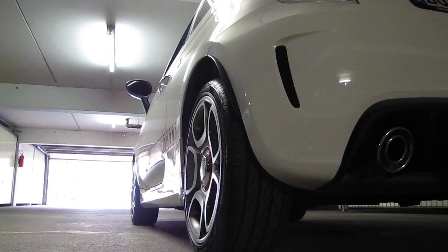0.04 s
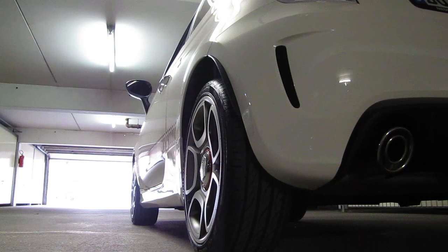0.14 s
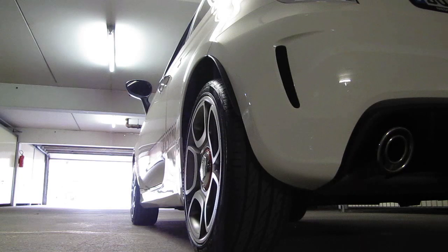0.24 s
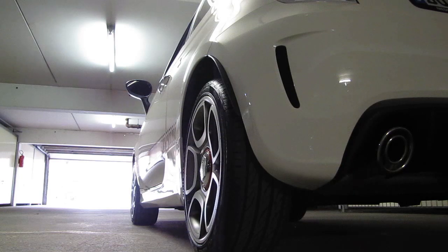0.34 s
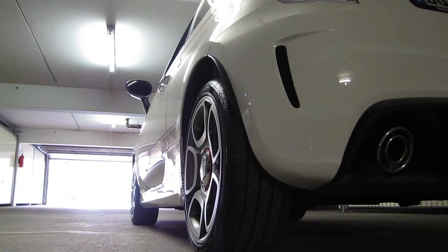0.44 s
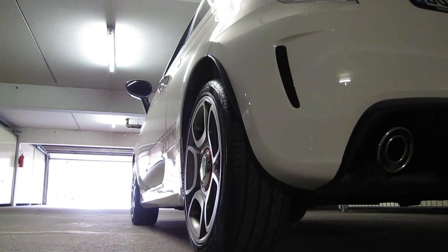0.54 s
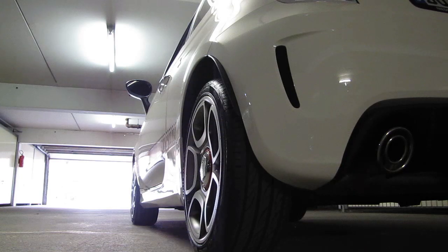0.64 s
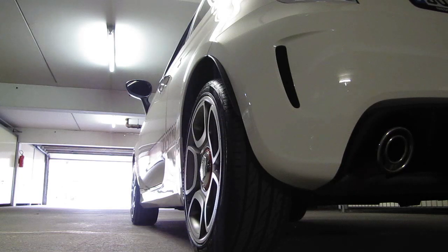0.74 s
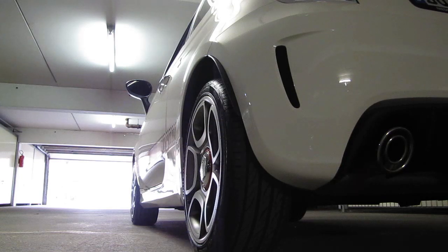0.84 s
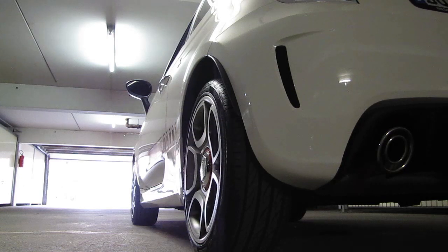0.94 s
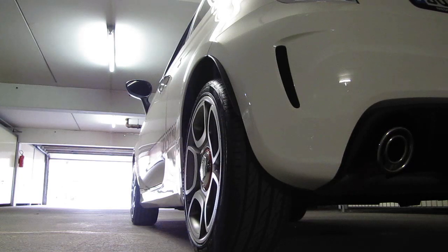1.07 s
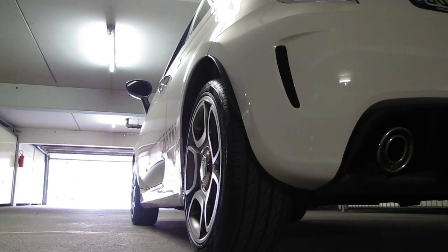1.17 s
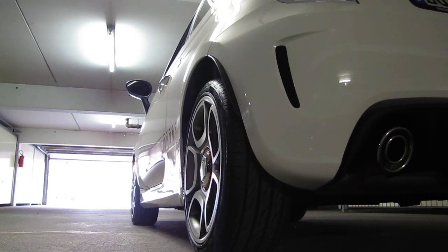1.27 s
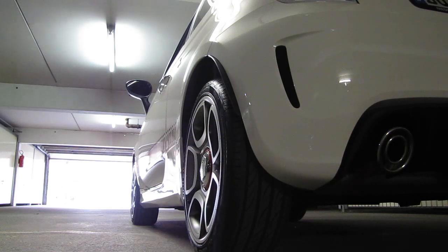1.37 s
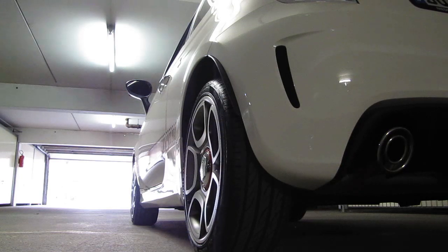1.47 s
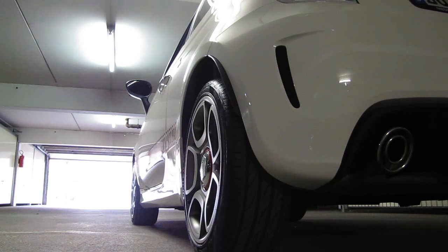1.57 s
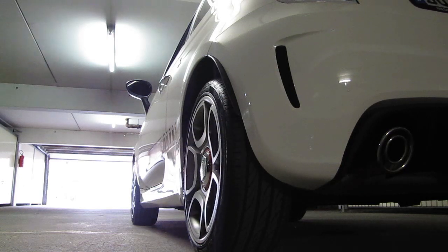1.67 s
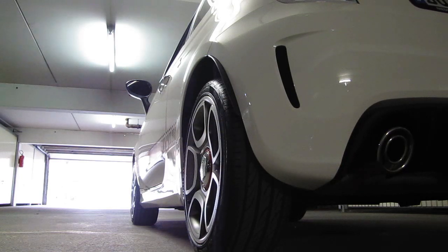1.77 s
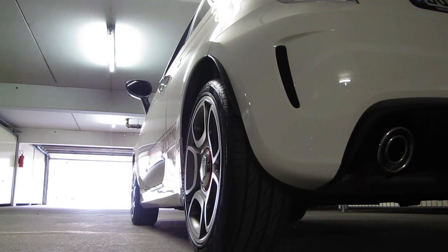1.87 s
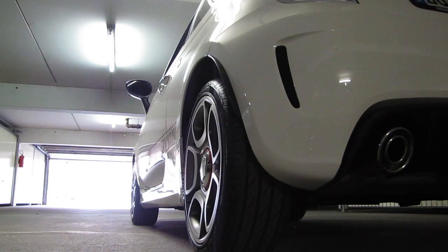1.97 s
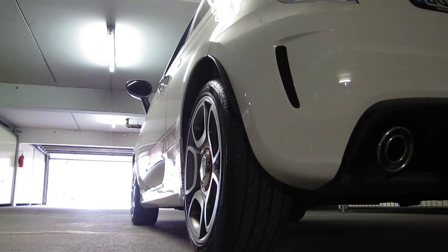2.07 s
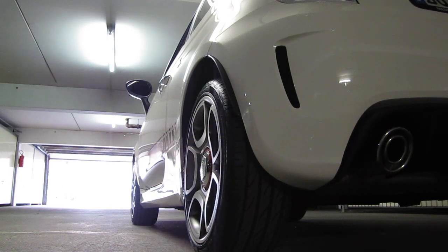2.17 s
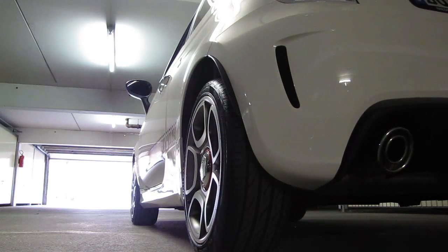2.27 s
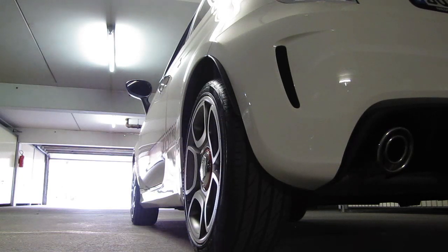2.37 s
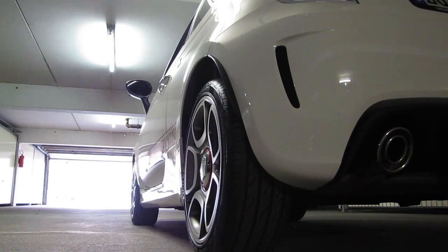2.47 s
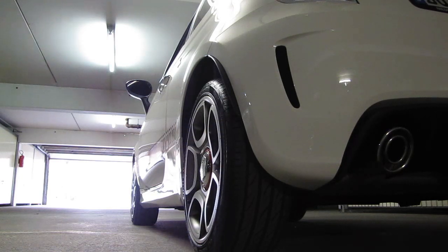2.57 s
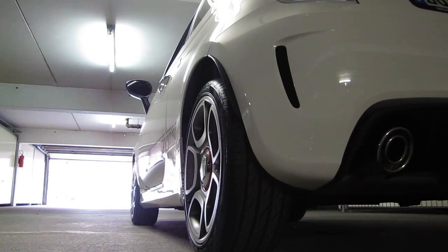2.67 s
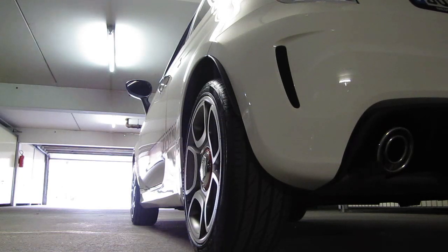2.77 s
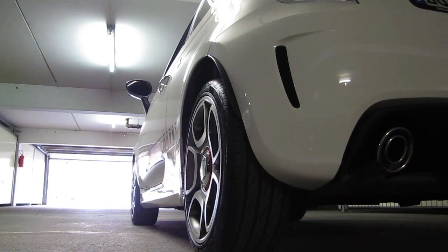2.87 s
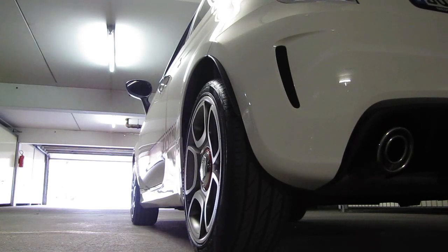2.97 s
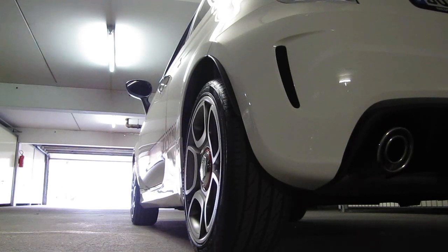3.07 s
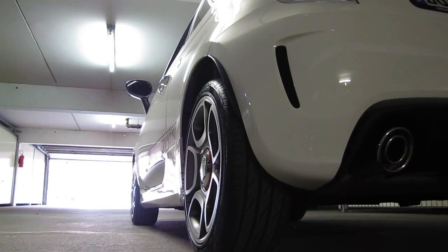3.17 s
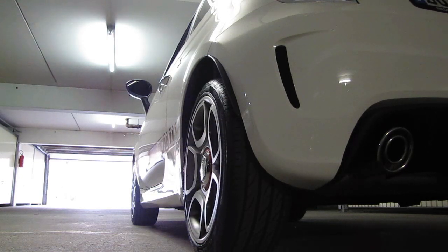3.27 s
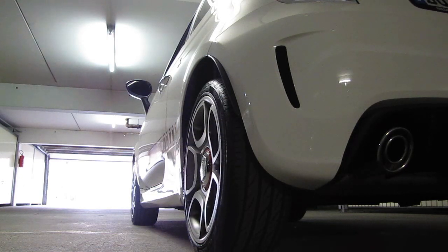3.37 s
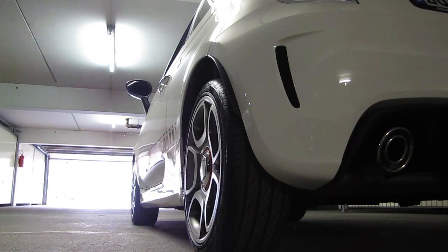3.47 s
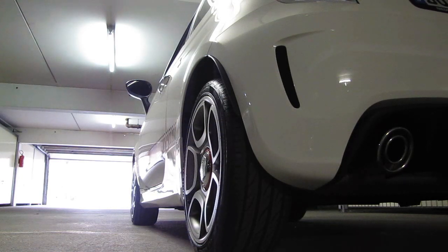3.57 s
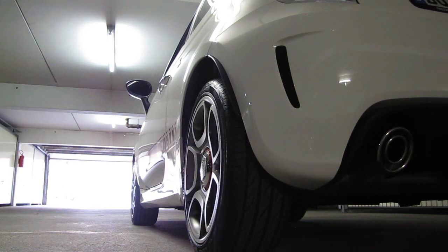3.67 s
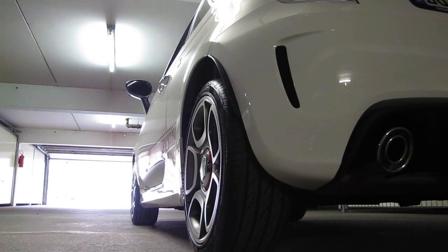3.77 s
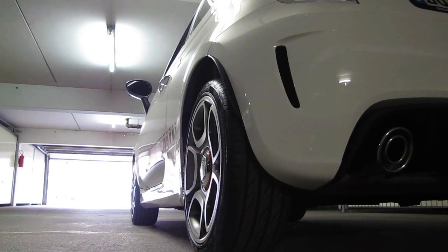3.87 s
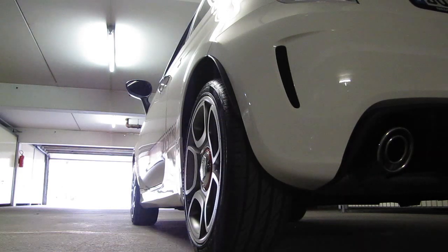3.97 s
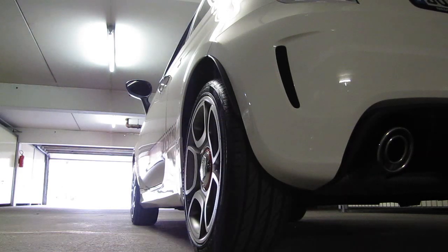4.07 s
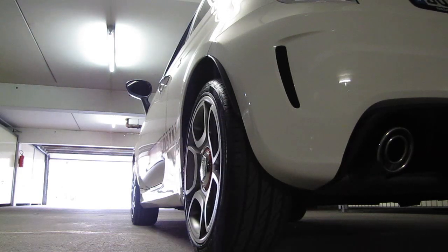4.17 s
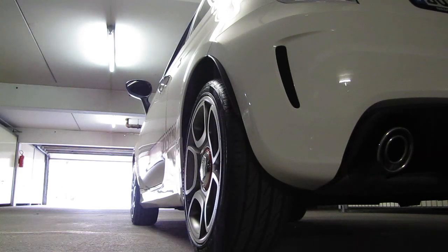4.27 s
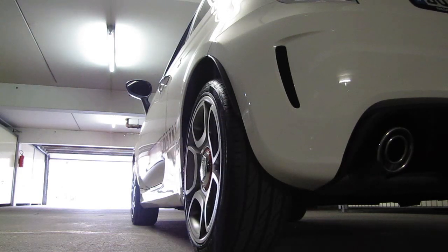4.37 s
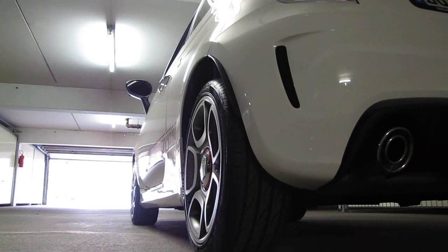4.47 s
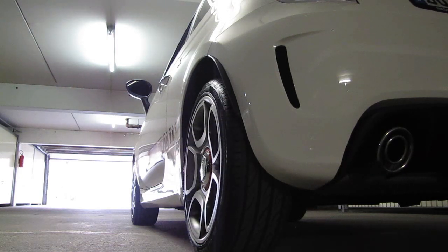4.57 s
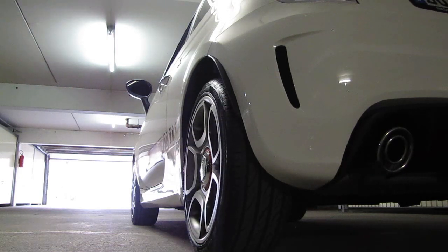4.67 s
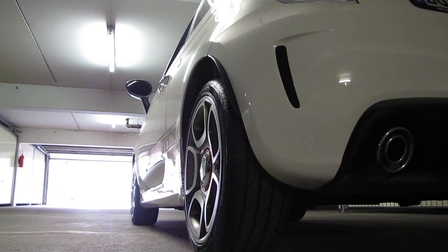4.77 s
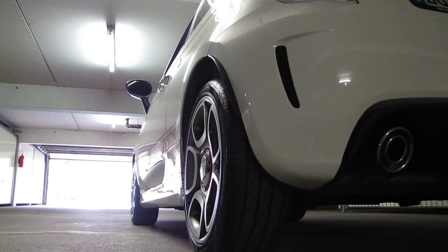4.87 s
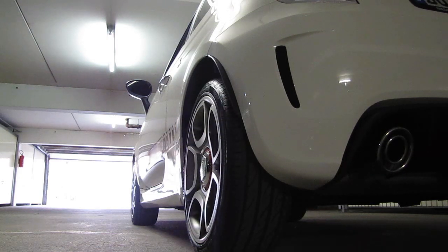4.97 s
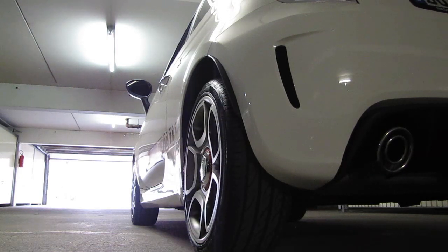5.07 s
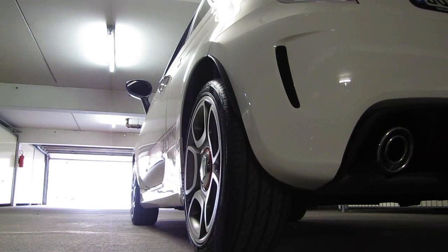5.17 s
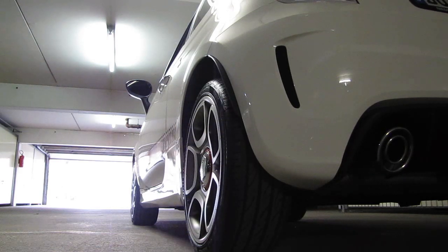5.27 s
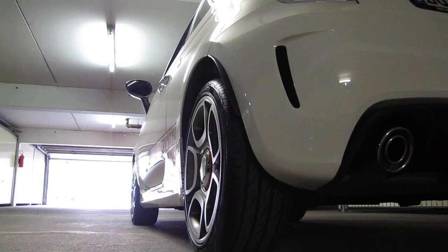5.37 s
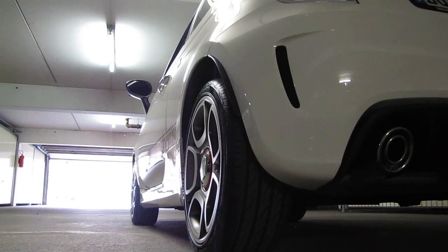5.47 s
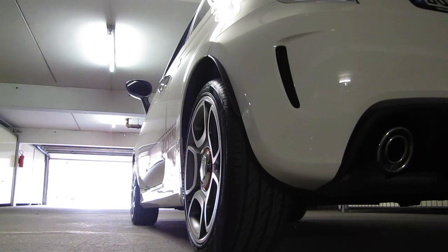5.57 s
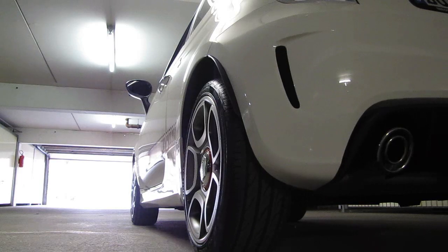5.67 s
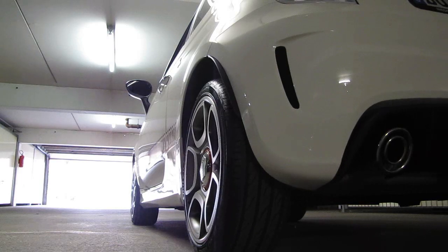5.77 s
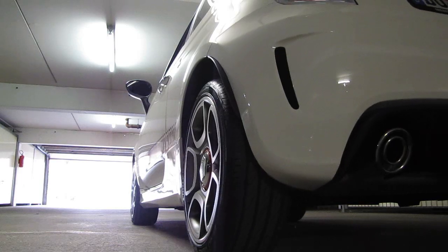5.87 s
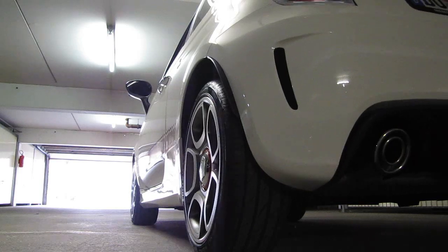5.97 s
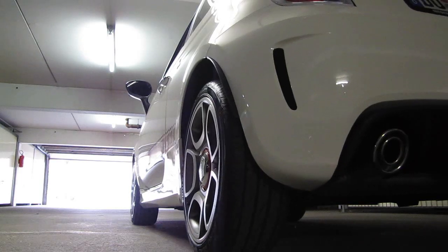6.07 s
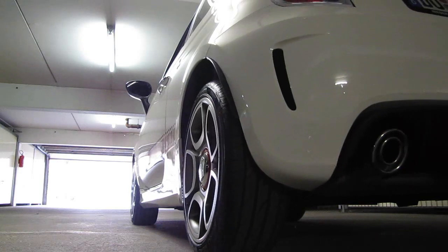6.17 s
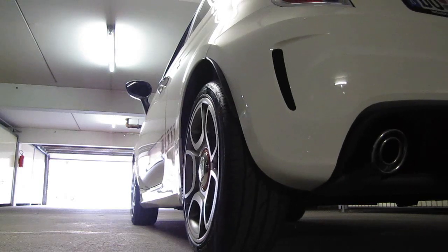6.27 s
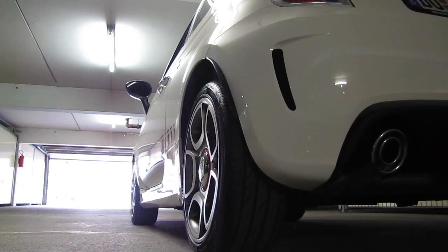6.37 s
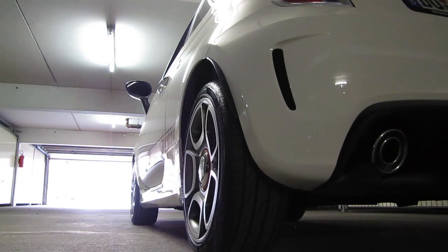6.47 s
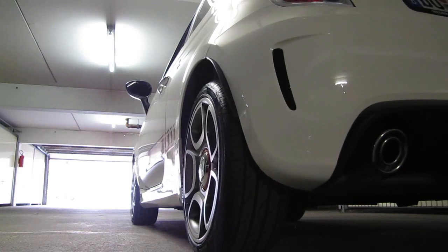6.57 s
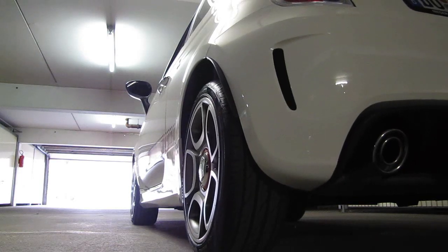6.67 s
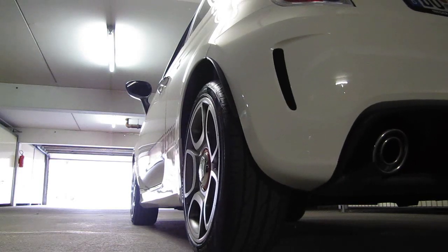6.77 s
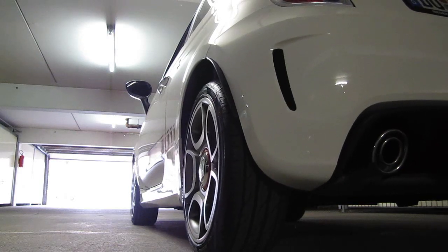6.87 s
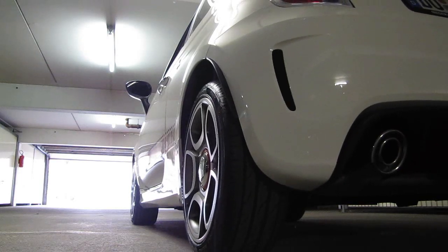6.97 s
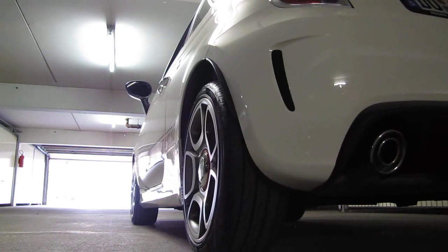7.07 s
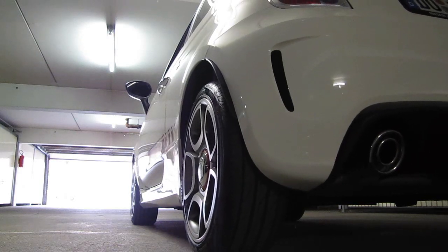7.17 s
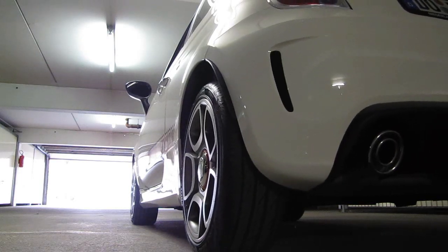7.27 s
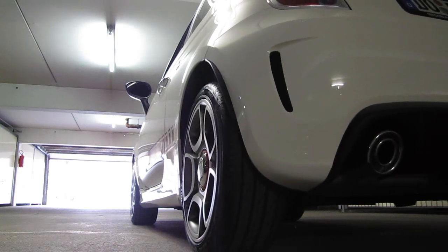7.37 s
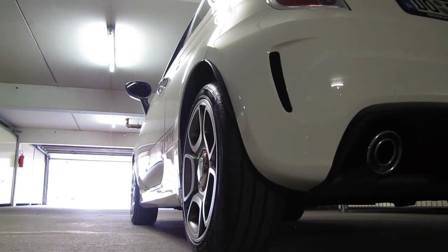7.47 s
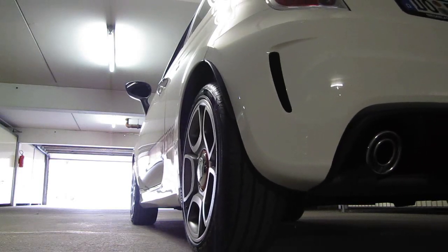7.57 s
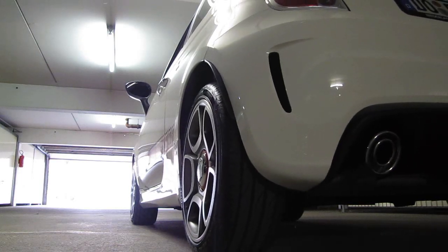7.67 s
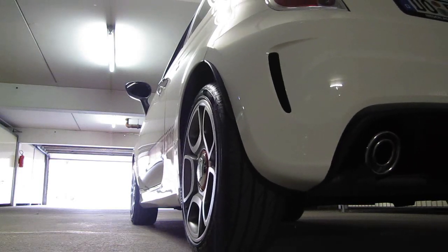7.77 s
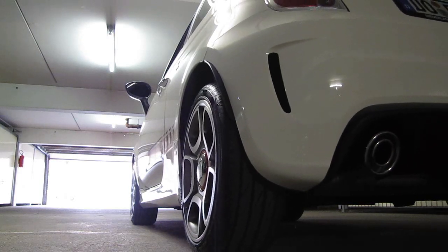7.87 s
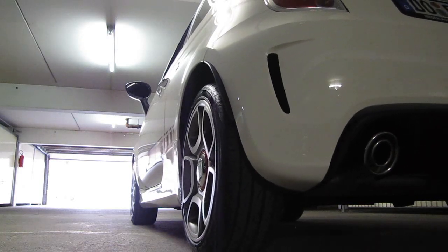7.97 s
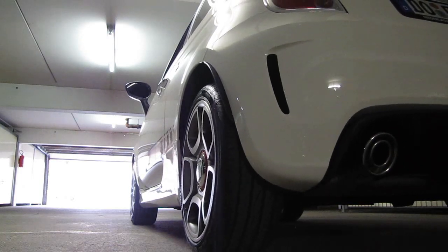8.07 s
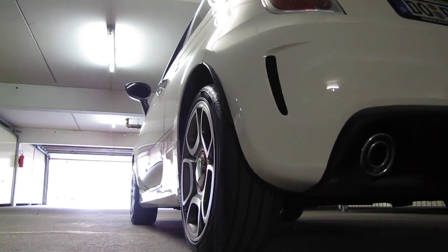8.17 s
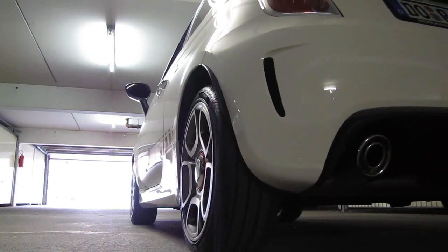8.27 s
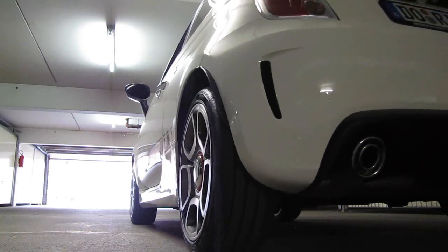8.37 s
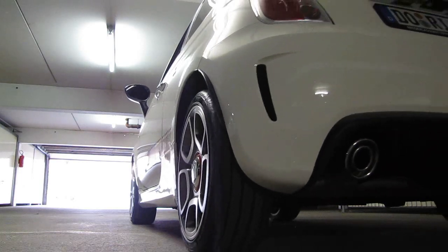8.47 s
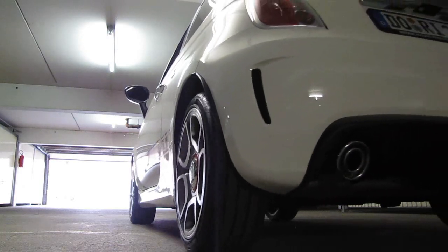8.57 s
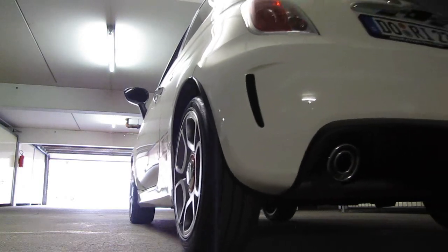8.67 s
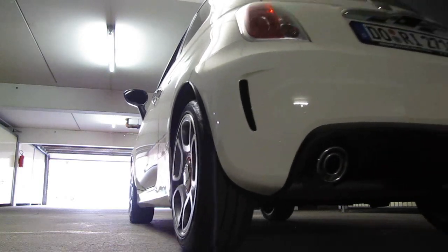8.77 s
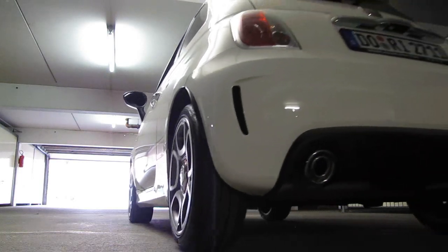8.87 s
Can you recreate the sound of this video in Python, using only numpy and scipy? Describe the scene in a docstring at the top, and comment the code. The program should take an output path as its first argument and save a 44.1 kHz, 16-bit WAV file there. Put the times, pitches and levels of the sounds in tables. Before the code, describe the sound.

In a concrete underground garage, close behind the tailpipe of a small car: a faint fuel-pump hum, then clacks and a short grinding starter crank. The engine catches with a heavy thump and boomy flare, while a thin starter whistle falls away. It sinks to a low burbling idle, a gear clunks in, the throttle is blipped softly then hard, and the revs climb with a brassy rasp as it pulls away.

```python
"""The engine of a small turbocharged four-cylinder car fires in a concrete garage, heard just behind its tailpipe.
Before that the fuel pump primes and the starter cranks; once the engine catches, the starter whistles down.
The engine settles to idle, a gear clunks in, the throttle is blipped twice and the car pulls away.
Engine: one pulse per firing rings the pipes, over a deep boom, bursts of gas noise and valve clatter.
Pump and whistle are mostly sine tones; starter and knocks are shaped noise with tones. Walls add echo to most parts."""
import sys
import numpy as np
from scipy import signal
from scipy.fft import rfft, irfft, next_fast_len
from scipy.io import wavfile
from scipy.ndimage import uniform_filter1d, map_coordinates

SR = 44100
rng = np.random.default_rng(int(sys.argv[2]) if len(sys.argv) > 2 else 0)


def digitize_waveform(pressure):
    """Quantize a signal to 16-bit integers and store it at the path in sys.argv[1].

    Rows of a 2-D input are taken as channels; values are limited to [-1, 1].
    """
    field = np.atleast_2d(pressure).T
    bounded = np.clip(field, -1, 1)
    quanta = np.round(bounded * 32767).astype(np.int16)
    wavfile.write(sys.argv[1], SR, quanta)


N = 393813
T = np.arange(N) / SR  # time of each sample (s)
TOP_HZ = 15780  # nothing above this is kept

# fuel pump, steady tones: [f/Hz, level/dB before the course below is added]
PUMP_TONES = [(199.2, -63.5), (349.9, -65), (602.9, -67), (807.5, -69.5), (2003, -71), (6008, -79),
              (8010, -91)]
# how the priming pump rises and fades: [t/s, hum change/dB, thin whine change/dB]
PUMP_COURSE = [(.08, -60, -60), (.095, 10.5, 1), (.3, 6, -2), (.5, 6, 1), (.65, 0, -2), (1.03, -17, 1),
               (1.15, -42, -40)]
# murmur of the garage air over time: [t/s, level/dB]
AIR_LEVEL = [(.075, -104), (.092, -51), (.3, -52), (.45, -51), (.65, -51), (1.0, -51), (1.45, -52)]
# tone colour of the garage air: [f/Hz, level/dB]
AIR_COLOUR = [(15, -37), (25, -4.5), (144, 1), (216, -10.5), (307, -0.5), (412, -14), (459, -4.5),
              (498, -10.5), (1310, -16), (1500, -20), (2020, -21), (2510, -22.5), (15700, -36.5)]

# dull thumps through the body, from pump, first firings and gear: [t/s, level/dB, f/Hz, time to fall 60 dB/s]
THUMPS = [(0.121, -31, 72, 0.26), (.455, -30.5, 77.6, .3), (.52, -37, 69, .25), (1.134, -42, 314, 0.3),
          (2.096, -6.5, 62, 0.13), (2.146, -5.5, 64, 0.37), (2.152, -19.5, 303.8, 0.65),
          (4.823, -23, 607.7, 0.088)]
# metal contacts of relay, solenoid, pinion and gear linkage:
# [t/s, level/dB, time to fall 60 dB/s, share of thin bright snap/0-1]
CLACKS = [(1.416, -45, .22, 0.99), (1.487, -10, 0.032, 0.14), (1.51, -20, 0.054, 0.2),
          (1.733, -18, 0.1, 0.04), (1.789, -30, 0.04, .05), (1.889, -35, .06, 0.2), (2.01, -21, 0.11, 0),
          (2.135, -17, 0.11, 0.06), (2.391, -23.5, 0.19, 0.2), (3.655, -34.5, 0.12, .05),
          (4.823, -18, 0.11, 0.1), (5.19, -28.5, 0.064, 0.04), (5.76, -37, 0.71, 0.1),
          (8.775, -34, 0.031, 0.56)]
# tone colour of struck metal: [f/Hz, level/dB]
METAL_COLOUR = [(400, -18), (900, -6.5), (1780, -5), (2130, -9), (2640, 0), (3480, -13.5), (3820, -5),
                (4260, -6), (10200, -28.5), (15700, -41)]
# ring of the metal parts: [f/Hz, width/Hz, level/dB]
METAL_RING = [(2646, 165, 0.5), (3040, 110, -1)]

# starter gear: [t/s, teeth meshing per second f/Hz, whine level/dB]
STARTER_GEAR = [(1.48, 285, -26), (1.6, 620, -25), (1.72, 830, -11), (1.82, 850, -11), (1.91, 860, -7),
                (1.98, 876, 2), (2.07, 876, -16.5), (2.2, 1300, -34)]
# tone colour of the cranking: [f/Hz, level/dB]
CRANKING_COLOUR = [(24, -26), (40, -1.5), (66, -1), (140, -12.5), (274, -0.5), (318, -11), (361, 4),
                   (511, -13), (864, -9), (932, -7.5), (1320, -9), (1500, -1.5), (2020, -9.5),
                   (4850, -13.5), (15700, -39)]
# resonances of the bell housing around the gear: [f/Hz, width/Hz, level/dB]
BELL_HOUSING = [(284, 4.2, 7), (374, 29, 2), (570, 25, -1.5), (798, 34, 6.5), (1434, 17, -8),
                (1460, 22, 8.5), (1527, 35, -10), (1824, 100, 6.5), (2230, 28, 2), (3010, 190, 2.5),
                (5100, 51, -34)]
# compression strokes that strain the starter: [t/s, peak level/dB]
STROKES = [(1.521, -16.5), (1.635, -28), (1.789, -22.5), (1.911, -21.5), (2.031, -18.5), (2.138, -24.5)]
STROKE_RISE_S, STROKE_FALL_S = 0.019, 0.027  # each surge builds and dies away
ENGAGE_S, RELEASE_S = 1.474, 2.115  # the pinion meshes and lets go
GRIND_DB, GRIND_FADE_DB_PER_S = -26, 102  # grinding between strokes, and its fade after letting go
# brief squeaks of the starter, later whistles of gas in the loaded tailpipe:
# [t/s, f/Hz, level/dB, half length/s]
SQUEAKS = [(1.486, 2600, -22, 0.0072), (1.488, 4010, -19.5, 0.0078), (1.61, 4920, -29, 0.022),
           (1.787, 3055, -21.5, 0.026), (1.81, 1485, -21, 0.031), (1.905, 3490, -22.5, 0.0151),
           (2.04, 1847, -25, 0.023), (3.57, 3140, -39, 0.0283), (7.01, 2113, -29.5, 0.034),
           (7.082, 2255, -30.5, 0.059), (8.511, 2620, -36, .025), (8.58, 3474, -41, 0.045),
           (8.67, 2670, -35, .028), (8.84, 3480, -39, .025)]

CATCH_S = 2.11  # the engine fires
# engine speed through flare, idle, small blip, big blip and pulling away: [t/s, firings per second f/Hz]
ENGINE_SPEED = [(2.12, 52.3), (2.3, 43.5), (2.4, 46.7), (2.62, 42), (2.9, 37.5), (3.2, 36.8), (3.62, 30.9),
                (3.76, 29.5), (4.0, 28.9), (4.25, 26.4), (5.98, 27.9), (6.12, 31.3), (6.22, 31.94),
                (6.37, 33.7), (6.58, 30.9), (6.82, 27.1), (7.02, 44), (7.24, 52.7), (7.36, 47.5),
                (7.48, 42.2), (7.7, 36.5), (7.85, 33.9), (8.03, 35.2), (8.32, 49.0), (8.46, 54.2),
                (8.7, 52.4), (8.92, 53.05)]
# how hard the engine pulls: [t/s, load/0-1]
ENGINE_LOAD = [(2.1, 0.45), (5.95, 0), (6.2, 0.26), (6.5, 0.34), (6.8, 0.13), (7.0, 0.93), (7.25, 0.79),
               (7.6, .2), (8.0, 0.28), (8.3, 0.82), (8.93, 0.92)]
# throttle moves: [start t/s, end t/s, opening (0 as at idle, 1 a full stab, below 0 shut)]
THROTTLE_MOVES = [(2.102, 2.18, 0.38), (3.678, 4.26, -0.73), (5.75, 5.897, -0.18), (6.005, 6.35, 0.72),
                  (6.633, 6.76, -1), (6.79, 6.97, 1.15), (8.058, 8.5, 0.37)]
OPEN_S, CLOSE_S = 0.068, .12  # a throttle move builds up and fades
# loudness at each engine speed, before the throttle adds to it:
# [firings per second f/Hz, drone level/dB, growl level/dB, rasp level/dB, clatter level/dB]
LEVEL_BY_SPEED = [(29.303, -18, -30, -34.5, -43), (30.8, -19, -26.5, -34.5, -45),
                  (34.5, -18, -24.5, -36, -44.5), (42.4, -17.5, -23, -31.5, -44),
                  (50.5, -20, -19.5, -29, -44)]
# added by a full stab of the throttle
DRONE_PUSH_DB, GROWL_PUSH_DB, RASP_PUSH_DB, CLATTER_PUSH_DB, BOOM_PUSH_DB = 4.5, 3, 2.5, 3, 4.5
# how tailpipe and garage carry the deep boom: [f/Hz, level/dB]
BOOM_CARRY = [(27, -25.5), (29, -33), (31.5, -24.5), (35, -36.5), (39, -25), (44, -21.5), (50, -26.5),
              (55, -22.5), (65, -20.5), (71, -28), (80, -24), (87, -31.5), (96, -31), (106, -21.5),
              (111, -29), (119, -36), (137, -45.5), (149, -35.5), (162, -40.5), (178, -48), (204, -52.5),
              (213, -26.5)]
# the four cylinders when fully uneven: [strength level/dB, extra travel time of the pulse/s]
CYLINDERS = [(-0.5, 0.00063), (1.5, 0.00064), (-2.5, 0.0028), (-2, 0.0024)]
EVEN_AT_LOAD = .95  # share of the cylinders' differences that full load removes
BUILD_S = 0.093  # pressure builds in the pipe after the first firing
# low resonances of the whole exhaust line: [f/Hz, width/Hz, level/dB]
EXHAUST_LINE = [(161, 14, -22.5), (193, 14, -15.5), (212, 15, -19.5)]
# resonances of the silencer: [f/Hz, width/Hz, level/dB]
SILENCER = [(236, 14.3, -12), (261.3, 20, -8.5), (295.96, 6.8, 7), (309.3, 7.3, 4.5)]
# resonances of the pipe: [f/Hz, width/Hz, level/dB]
PIPE = [(366, 22, -3), (400, 17.3, -1.5), (431, 21.8, -0.5), (523, 24.4, -9), (576, 24.7, -2.5),
        (613.5, 23, -8.5), (665, 10.6, -4)]
# resonances of the tailpipe under load: [f/Hz, width/Hz, level/dB]
TAILPIPE = [(707, 67, -8.5), (1014, 91, -3), (1112, 37, 0.5), (1416, 85, -1), (1803, 125, -5),
            (2123, 53, -1), (2303, 38, -3), (2600, 75, -1), (2995, 58, -6), (3414, 130, -10.5),
            (6430, 710, -15.5)]
# tone colour of the soft gas noise: [f/Hz, level/dB]
GAS_COLOUR = [(350, -16), (600, -1), (756, -6.5), (848, -1.5), (1330, -6), (1440, -4.5), (2270, -14),
              (2570, -14), (3180, -25), (4080, -18), (5000, -30.5), (6500, -54), (11000, -120)]
# tone colour of the valve clatter: [f/Hz, level/dB]
CLATTER_COLOUR = [(1760, -39), (3000, -1.5), (3190, -6.5), (4100, -7), (5440, -10), (6120, -13.5),
                  (6790, -15.5), (7800, -15), (8950, -20), (12200, -24.5), (14400, -32), (15700, -35)]
DRY_DB, OIL_S = 15.5, 0.71  # extra valve clatter at first, and how slowly it fades as the oil arrives
# thin whine of the running engine: [t/s, level/dB]
ENGINE_WHINE = [(3.3, -75), (3.8, -60), (4.5, -55.5), (5.5, -52.5), (6.6, -53), (7.0, -60), (7.9, -58),
                (8.4, -65)]

# the freed starter is spun up by the engine, then coasts against bearing friction and drag
COAST_AT_S, SPIN_TOP_HZ, SPIN_UP_HZ_PER_S = 2.42, 10000, 3100
FRICTION_HZ_PER_S, DRAG_S = 5020, 2.37  # steady braking, and time constant of the drag
# whistle of the freed starter: [t/s, level/dB]
WHISTLE_LEVEL = [(2.15, -63), (2.37, -47), (2.5, -53), (2.8, -44), (3.0, -42), (3.3, -43.5), (3.6, -55),
                 (3.7, -87)]

# echo of the concrete walls: [f/Hz, time to fall 60 dB/s]
WALL_ECHO = [(60, 1.4), (300, 1.05), (2000, 1.37), (6000, 1), (14000, 0.1)]
# stereo width: [f/Hz, side minus middle level/dB]
STEREO_WIDTH = [(30, 2), (150, -7.5), (400, -14), (700, -11.5), (1300, -7.5), (2400, -4.5), (4400, -2),
                (8000, 2), (15000, -1)]


def amp(db):
    """Turns decibels into a gain."""
    return 10 ** (np.asarray(db) / 20)


def unit(x):
    """Scales x to an average (rms) strength of 1."""
    return x / np.sqrt(np.mean(x ** 2) + 1e-20)


def steady(x):
    """Evens out slow loudness changes to about rms 1 but keeps the quick throb."""
    power = np.mean(np.atleast_2d(x) ** 2, axis=0)
    for _ in range(2):
        power = uniform_filter1d(power, size=6000)
    return x / np.sqrt(np.abs(power) + 1e-12)


def along(points, hz):
    """Reads a value between (Hz, value) points, on a log frequency axis."""
    f, v = np.transpose(points)
    return np.interp(np.log(hz + 1), np.log(f + 1), v)


def curves(rows):
    """Draws one value per sample for each column after the time."""
    s, *cols = np.transpose(rows)
    return [np.interp(T, s, c) for c in cols]


def wobble(rate):
    """A smooth random curve with rate new random points a second."""
    return map_coordinates(rng.standard_normal(int(N * rate / SR) + 4), [T * rate])


def filtered(x, response):
    """Multiplies the frequencies of x by a response, with spare room at the end for ringing."""
    m = next_fast_len(N + SR // 2)
    hz = np.fft.rfftfreq(m, 1 / SR)
    return irfft(rfft(x, m) * response(hz), m)[..., :N]


def coloured(x, spectrum):
    """Shapes the tone of x by (Hz, dB) points."""
    return filtered(x, lambda hz: amp(along(spectrum, hz)))


def ringing(x, modes):
    """Lets x ring a set of (Hz, width Hz, dB) resonances, with alternating signs."""
    def response(f):
        total = 0
        for k, (centre, width, db) in enumerate(modes):
            damping = 1j * f * width
            total = total + (-1) ** k * amp(db) * damping / (centre * centre - f * f + damping)
        return total
    return filtered(x, response)


def spread(pair):
    """Spreads two unrelated signals to left and right by the width table."""
    side = coloured(pair[1], STEREO_WIDTH)
    return np.array([pair[0] + side, pair[0] - side])


def noise():
    """Stereo hiss made from two white noises."""
    return spread(rng.standard_normal((2, N)))


def garage(x, wet_db):
    """Adds the wash from the concrete, where each frequency dies away at its own speed."""
    hz, t, z = signal.stft(rng.standard_normal((2, SR)), SR, nperseg=256)
    decay = amp(-60 * t / along(WALL_ECHO, hz)[:, None])
    tail = signal.istft(z * decay, SR, nperseg=256)[1]
    tail = tail / np.linalg.norm(tail[0])
    wash = signal.fftconvolve(np.atleast_2d(x), tail, axes=1)[:, :N]
    return x + amp(wet_db) * spread(wash)


def puffs(turns, fade, between):
    """Turbulence that bursts at every cycle and fades to a weaker flow."""
    return noise() * (np.exp(-fade * (turns % 1)) + abs(between))


def waiting_car():
    """The fuel pump hums, whines and churns for a second over the murmur of the garage air."""
    hum_db, whine_db = curves(PUMP_COURSE)
    tones = 0
    for hz, db in PUMP_TONES:
        course_db = hum_db if hz < 1000 else whine_db
        level = np.sqrt(2) * amp(db + course_db + 1.7 * wobble(11.9))
        tones = tones + level * np.sin(2 * np.pi * hz * T + 0.4 * wobble(25))
    fuel_colour = [(60, -22), (130, 1), (380, 8.0), (500, -4), (780, 3.5), (1200, -14.5), (2500, -33), (9000, -43)]
    fuel = amp(hum_db - 58) * unit(coloured(noise(), fuel_colour))
    air = amp(curves(AIR_LEVEL)[0]) * unit(coloured(noise(), AIR_COLOUR))
    return tones + fuel + air


def knocks():
    """Ringing metal clacks, thin snaps and dull thumps strike, die away and echo off the walls."""
    clacks, snaps, thumps = np.zeros((3, N))
    t = np.arange(SR // 2) / SR
    for s, db, t60, bright in CLACKS:
        start, share = round(s * SR), np.clip(bright, 0, 1)
        blow = amp(db - 60 * t / t60) * (1 - np.exp(-t / 0.00045))
        blow = blow[:N - start]
        clacks[start:][:len(blow)] += np.sqrt(1 - share) * blow
        snaps[start:][:len(blow)] += np.sqrt(share) * blow
    for s, db, hz, t60 in THUMPS:
        envelope = amp(db - 60 * t / t60) * (1 - np.exp(-t / 0.0026))
        thumps[round(s * SR):][:len(t)] += envelope * np.sin(2 * np.pi * hz * t)
    metal = clacks * unit(coloured(noise(), METAL_COLOUR))
    snap = snaps * unit(coloured(noise(), [(1500, -10), (3800, -1), (9000, -3), (15500, -19)]))
    bright_part = metal + ringing(metal, METAL_RING) + snap
    return garage(bright_part, wet_db=-8.5) + garage(thumps, wet_db=-13.5)


def strain():
    """Gain of the starter's grinding: steady while meshed, with a surge on every compression stroke."""
    meshed = np.clip((T - ENGAGE_S) / 0.0089, 0, 1)
    surges = 0
    for s, db in STROKES:
        distance = np.maximum((s - T) / STROKE_RISE_S, (T - s) / STROKE_FALL_S)
        surges = surges + amp(db) * np.exp(-distance)
    grind_db = GRIND_DB - GRIND_FADE_DB_PER_S * np.maximum(T - RELEASE_S, 0)
    return meshed * (amp(grind_db) + surges)


def starter():
    """Gear teeth grind and ring the bell housing, louder on every compression stroke."""
    mesh_hz, whine_db = curves(STARTER_GEAR)
    teeth = np.cumsum(mesh_hz) / SR
    grind = puffs(teeth, fade=3.1, between=0.79) * amp(0.99 * wobble(260))
    gear = amp(whine_db) * (np.sin(2 * np.pi * teeth) + 0.27 * np.sin(4 * np.pi * teeth))
    body = unit(coloured(grind, CRANKING_COLOUR)) + 0.73 * unit(ringing(grind, BELL_HOUSING)) + gear
    # the engine cover muffles the highest part
    body = coloured(body, [(7500, 0), (11000, -2.0), (15000, -6)])
    # the deep chug only builds once the crankshaft turns
    at_rest = np.interp(T, [1.5, 1.54], [1, 0])
    body = body - at_rest * coloured(body, [(130, -1.5), (260, -34), (600, -90)])
    return garage(strain() * body, wet_db=-9.5)


def squeaks():
    """Brief squeaks of the starter, and later whistles of gas in the loaded tailpipe, sing with an unsteady pitch."""
    out, waver = np.zeros(N), wobble(400)
    for s, hz, db, half in SQUEAKS:
        near = np.abs(T - s) < 3 * half
        phase = 2 * np.pi * np.cumsum(hz * (1 + .02 * waver[near])) / SR
        swell = np.exp(-((T[near] - s) / half) ** 2)
        out[near] += amp(db) * swell * np.sin(phase)
    return garage(out * amp(2.5 * wobble(110)), wet_db=-8)


def throttle():
    """Opening of the throttle relative to idle: each move builds up, holds and fades."""
    total = 0
    for on, off, opening in THROTTLE_MOVES:
        build = np.clip((T - on) / OPEN_S, 0, 1)
        total = total + opening * build * np.exp(-np.maximum(T - off, 0) / CLOSE_S)
    return total


def loudness():
    """Levels in dB of drone, growl, rasp and clatter, set by engine speed and throttle."""
    hz, push = curves(ENGINE_SPEED)[0], throttle()
    speeds, *levels = np.transpose(LEVEL_BY_SPEED)
    pushes = DRONE_PUSH_DB, GROWL_PUSH_DB, RASP_PUSH_DB, CLATTER_PUSH_DB
    return [np.interp(hz, speeds, db) + push_db * push for db, push_db in zip(levels, pushes)]


def firings(turns, uneven, scatter_db, jitter):
    """One pulse per firing, with the strength and lag of its cylinder scaled by uneven (0-1)."""
    at = np.flatnonzero(np.diff(np.floor(turns)))
    chance = rng.standard_normal((len(at), 2))
    cylinder = np.arange(len(at)) % len(CYLINDERS)
    db, lag = np.array(CYLINDERS)[cylinder].T * uneven[at]
    delay = np.round((lag + jitter * chance[:, 1]) * SR).astype(int)
    at = np.clip(at + delay, 0, N - 1)
    return unit(np.bincount(at, amp(db + scatter_db * chance[:, 0]), N))


def boom(turns):
    """The lowest multiples of the firing rate swell and sink as they sweep through fixed resonances."""
    hz, push_db = curves(ENGINE_SPEED)[0], BOOM_PUSH_DB * throttle()
    # pipe and walls delay each multiple differently: the sharp idle throb smears as the speed rises
    smear = 0.0867 * (hz - hz.min())
    orders = 0
    for k in range(1, 5):
        level = np.sqrt(2) * amp(along(BOOM_CARRY, k * hz) + push_db + 0.3 * wobble(14))
        orders = orders - level * np.cos(2 * np.pi * k * turns + smear * k * k / 2)
    rumble_colour = [(15, -36), (30, 5.5), (80, 1.5), (130, -3.5), (190, -9.0), (300, -42), (900, -89)]
    rumble = unit(coloured(puffs(turns, fade=2.3, between=0.8), rumble_colour))
    # left and right gain of the tones, in dB
    return orders * amp([[.2], [-.2]]) + amp(-30.5) * rumble


def exhaust(turns):
    """Each firing rings the silencer and the pipe; load evens the beat and opens a brassy rasp in the tailpipe."""
    drone_db, growl_db, rasp_db, _ = loudness()
    load = np.clip(curves(ENGINE_LOAD)[0], 0, 1)
    # long waves hardly feel the differences between cylinders; shorter ones burble once per four firings
    even = firings(turns, np.zeros(N), scatter_db=-2.5, jitter=.00005)
    uneven = 1 - np.clip(EVEN_AT_LOAD, 0, 1) * load
    pulses = firings(turns, uneven, scatter_db=1.4, jitter=.00007)
    gas = unit(puffs(turns, fade=5.3, between=0.57))
    turbulence = .2 * gas

    drone = ringing(even + 0.092 * gas, EXHAUST_LINE)
    drone = drone + ringing(garage(pulses, wet_db=-6) + turbulence, SILENCER)
    drone = coloured(drone, [(90, -37), (150, 6.5), (315, -4.0), (380, 0), (600, -25.0), (1500, -52.5)])

    growl = ringing(pulses + 1.76 * turbulence, PIPE)
    growl = coloured(growl, [(150, -24), (330, 7), (750, -9.5), (1500, -25), (4000, -67)])

    soft = steady(coloured(puffs(turns, fade=4.8, between=2.4), GAS_COLOUR))
    hard = ringing(pulses + 0.68 * gas, TAILPIPE)
    hard = coloured(hard, [(300, -22), (600, 9.0), (7000, -4), (12000, -13)])
    # the hard rasp takes over from soft gas noise as the load grows
    rasp = np.sqrt(1 - load) * soft + np.sqrt(load) * steady(garage(hard, wet_db=1.5))

    pressure = 1 - np.exp(-np.maximum(T - CATCH_S, 0) / BUILD_S)
    drone = amp(drone_db) * steady(drone)
    growl = pressure * amp(growl_db) * steady(garage(growl, wet_db=0))
    rasp = amp(rasp_db + 0.81 * wobble(16)) * rasp
    return drone + growl + rasp


def valves(turns):
    """Valves and injectors patter with every firing under a thin whine."""
    ticks = puffs(turns, fade=4.5, between=2.3) * amp(0.59 * wobble(160))
    dry_db = DRY_DB * np.exp(-np.maximum(T - CATCH_S, 0) / OIL_S)
    clatter = amp(loudness()[3] + dry_db) * unit(coloured(ticks, CLATTER_COLOUR))
    phase = 2 * np.pi * np.cumsum(5945 + 35 * wobble(200)) / SR
    whine_gain = amp(curves(ENGINE_WHINE)[0] + 1.2 * wobble(18))
    whine = whine_gain * (np.sin(phase) + 0.12 * np.sin(2 * phase))
    return clatter + garage(whine, wet_db=-7.5)


def engine():
    """Everything that the crankshaft drives, from the first firing on."""
    turns = np.cumsum(curves(ENGINE_SPEED)[0]) / SR  # firings counted so far
    running = np.clip((T - CATCH_S) / 0.023, 0, 1)
    return running * (boom(turns) + exhaust(turns) + valves(turns))


def spin_hz():
    """Pitch of the freed starter: a short climb, then a slowing fall to rest."""
    since, friction_hz = T - COAST_AT_S, FRICTION_HZ_PER_S * DRAG_S
    climbing = SPIN_TOP_HZ + SPIN_UP_HZ_PER_S * since
    coasting = (SPIN_TOP_HZ + friction_hz) * np.exp(-since / DRAG_S) - friction_hz
    return np.maximum(np.minimum(climbing, coasting), 0)


def spin_down():
    """The freed starter motor coasts to rest with a falling, fluttering whistle."""
    hz, db = spin_hz(), curves(WHISTLE_LEVEL)[0]
    phase = 2 * np.pi * np.cumsum(hz * (1 + 0.0099 * wobble(600))) / SR
    whistle = 0
    for k, level_db in enumerate([0, -11, -19], 1):
        whistle = whistle + amp(level_db) * (k * hz < TOP_HZ) * np.sin(k * phase)
    # the casing carries the low whistle best, dips near 7 kHz, peaks again near 10 kHz, then falls off
    whistle = coloured(whistle, [(3000, 2.5), (7000, -6.5), (10500, 1.5), (12500, -9), (15500, -17)])
    return garage(whistle * amp(db + 3 * wobble(35)) * (T > CATCH_S), wet_db=-5)


def scene():
    """The car in the garage: all sounds added together."""
    return waiting_car() + knocks() + starter() + squeaks() + engine() + spin_down()


def record(dry):
    """The right microphone is a little brighter; nothing is kept above the band limit."""
    lean = [(60, 1.0), (500, -0.29), (2000, -1.9), (6000, -1.0), (12000, -1.3)]  # (Hz, left minus right dB)
    fade = np.minimum((T[-1] - T) / .003, 1)
    return filtered(dry * fade, lambda hz: amp(np.outer([.5, -.5], along(lean, hz))) * (hz < TOP_HZ))


dry = scene()
out = record(dry)
digitize_waveform(out)
```